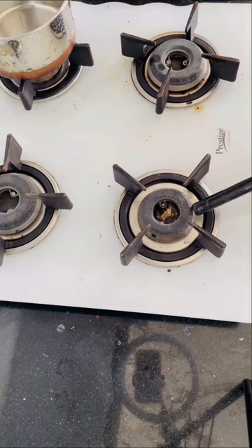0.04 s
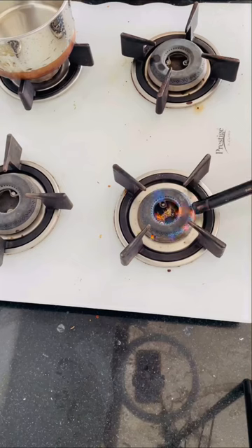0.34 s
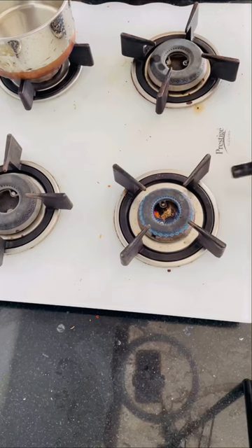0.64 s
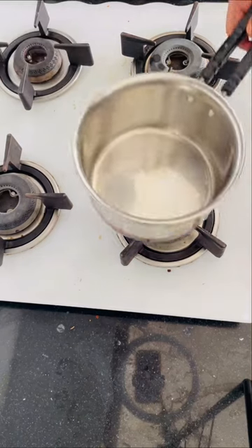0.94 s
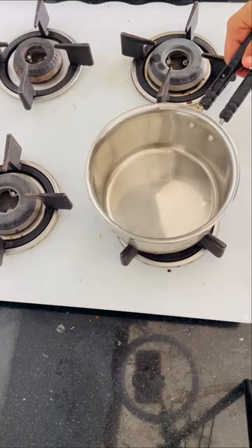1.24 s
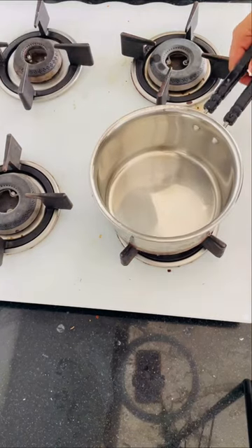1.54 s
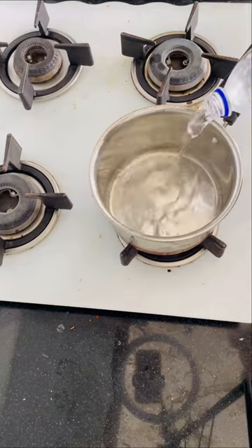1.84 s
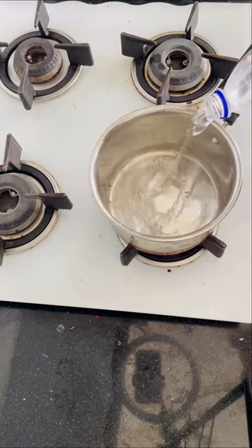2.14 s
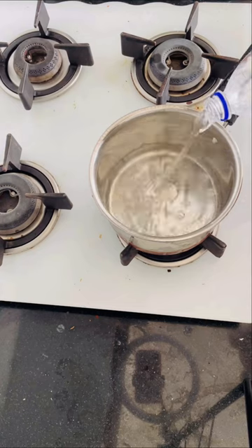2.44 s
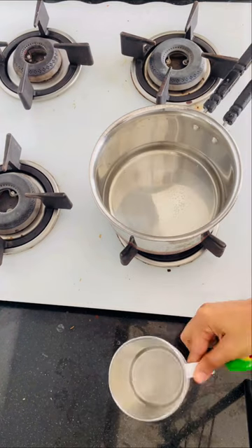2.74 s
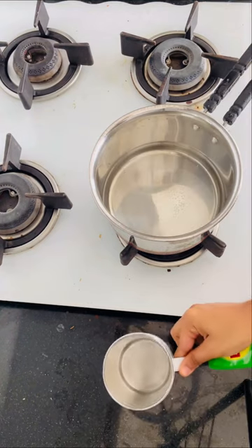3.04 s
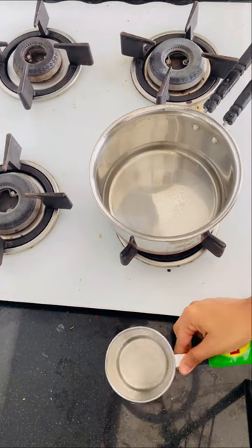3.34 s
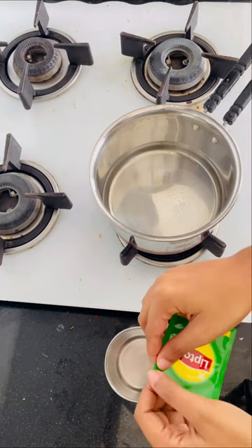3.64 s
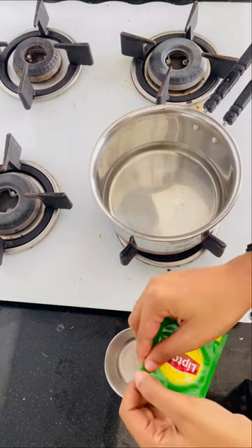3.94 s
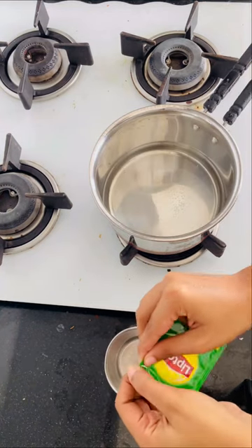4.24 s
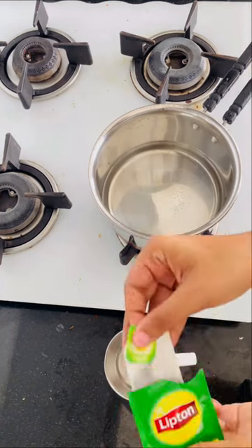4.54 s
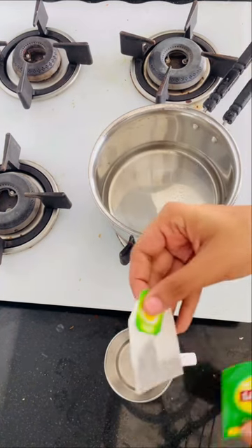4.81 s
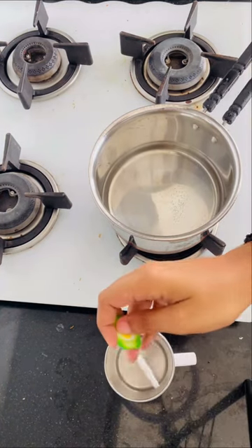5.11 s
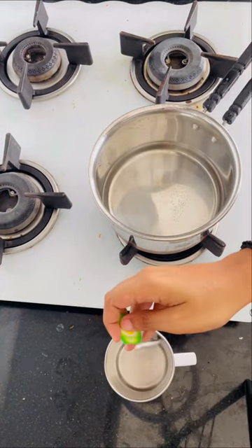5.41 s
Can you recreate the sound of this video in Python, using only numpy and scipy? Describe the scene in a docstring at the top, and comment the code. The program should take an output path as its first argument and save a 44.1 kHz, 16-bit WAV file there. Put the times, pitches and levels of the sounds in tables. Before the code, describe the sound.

A spark lighter snaps at a gas burner and the flame catches with a soft, low puff. A steel pot clangs onto the grate, rattling and ringing as it settles. Water glugs into it from a crackling plastic bottle and stops abruptly. A mug clacks onto a stone counter, then a foil tea sachet crinkles and tears open. A phone microphone hears it from above in a small, hard-walled kitchen with a faint motor hum.

```python
"""A steel pot clangs onto the grate of a gas hob, its thin wall ringing as it rocks and settles. Tea is being
made in a small hard-walled kitchen, heard from above by a phone's two microphone ports. First a spark lighter
snaps and the gas catches; after the pot lands, water glugs into it from a crackling plastic bottle, a mug is
put on the stone counter and a foil tea sachet is torn open. A motor and the mains hum in the background."""
import sys
import numpy as np
from scipy import signal
from scipy.fft import rfft, irfft, next_fast_len
from scipy.io import wavfile
from scipy.ndimage import uniform_filter1d, map_coordinates

SR = 44100
rng = np.random.default_rng(int(sys.argv[2]) if len(sys.argv) > 2 else 0)


def to_wav(sig):
    """Store sig (one row per channel, or 1-D mono) as 16-bit WAV at the path in sys.argv[1].

    Samples outside -1..1 are clipped; the rate is SR.
    """
    pcm = np.clip(np.atleast_2d(sig), -1, 1) * 32767
    pcm = np.round(pcm).astype(np.int16)
    wavfile.write(sys.argv[1], SR, pcm.T)  # frames by channels


N = 250070
TIME, RING_TIME = np.arange(N) / SR, np.arange(SR) / SR  # the whole scene; one second for a ring-out


# the pot lands and rocks on the grate: t/s, then relative level/dB of wall, base, hob, scrape
POT_HITS = [(1.2524, -24.5, -10.5, -21, -16.5), (1.2616, -24.5, -12.5, -26.5, -21.5),
            (1.279, -27.5, -30.5, -44.5, -28), (1.371, -55, -24.5, -37, -56),
            (1.4087, -31, -24.5, -25, -42), (1.4862, -41, -21, -31, -44), (1.691, -80, -37, -42.5, -70)]
# modes of the pot's wall, and of its base pressed on the grate: f/Hz, level/dB, t60/s
WALL_MODES = [(991, -17, .4), (1082, -10, 0.55), (1275, 2.5, 0.77), (1378, -12, .6), (1553, -9, 0.7),
              (1625, -9.5, 0.8), (1877, -1.5, 0.8), (1981, -14, 0.6), (2099, -9.5, 0.9), (2363, -9, 1.1),
              (2406, -10, 0.6), (2470, -5, 0.35), (2686, 4, 0.5), (2794, -10, 0.27), (3018, -17, .8),
              (3095, -13, .55), (3208, -12, 0.5), (3370, -17, .5), (3460, -17, .5), (3784, -9, 0.45),
              (3838, -13, .5), (4140, -5.5, 0.27), (4245, -11, 0.25), (4490, -13.5, .55), (4795, -18, .45),
              (4936, -18, .3), (5132, -6, 0.3), (5270, -11.5, 0.32), (5940, -18, 0.3), (8360, -22.5, 0.25),
              (9470, -13, 0.18)]
BASE_MODES = [(85.3, -15.5, 1.58), (354, -6.5, 0.36), (495, -8, 0.38), (563, 3.5, 0.13), (609, -4, 0.19),
              (699, -5, 0.22), (786, -9, .2), (870, -12, 0.13), (1428, -.5, 0.19), (1465, -5, 0.15)]
# spectra of the hob's sheet-metal top, and of the pot scraping the grate: f/Hz, level/dB
HOB_SPECTRUM = [(40, -28.5), (90, 6), (200, -3), (340, 2), (420, -2.5), (580, -6.5), (760, -1),
                (1000, -23.5), (2000, -16), (6000, -53)]
SCRAPE_SPECTRUM = [(200, -28), (700, 15.5), (1500, -12), (2800, -8.5), (5300, -11), (7000, -15.5),
                   (10500, -9), (13000, -24.5), (16000, -17)]
def pot():
    """At the hob, each contact rings the pot's thin wall, its damped base and the metal top beneath."""
    times, wall_db, base_db, hob_db, scrape_db = np.transpose(POT_HITS)
    wall = amp(-5.5) * struck(WALL_MODES, times, wall_db, drift=4, twin_db=-9, split_hz=9.92)
    grate_damping = fade(np.maximum(RING_TIME - .28, 0), t60=1.8)  # sets in once the pot sits
    out = rattle(times[0])
    upper_modes = shimmer(count=40, low_hz=2195, octaves=1.6, t60=0.41)
    base = amp(-3.5) * struck(BASE_MODES, times, base_db, drift=3.13, twin_db=-16.5, split_hz=20)
    add(out, times[0], wall * grate_damping + base)
    for s, ring_db, boom_db, grit_db in zip(times, wall_db, hob_db, scrape_db):
        add(out, s, amp(ring_db - 24) * upper_modes)
        add(out, s, amp(boom_db) * dying(HOB_SPECTRUM, t60=0.42, attack=0.00065))
        add(out, s, amp(grit_db) * dying(SCRAPE_SPECTRUM, t60=0.13, attack=0.00033))
    return in_kitchen(out, wet_db=-10, apart_db=-3.5)


def struck(modes, times, levels_db, drift, twin_db, split_hz):
    """Every contact feeds the modes; each beats against a close twin and wanders as the pot rocks."""
    t = RING_TIME
    out = np.zeros(len(t))
    for hz, db, t60 in modes:
        energy, decay = np.zeros(len(t)), fade(t, t60) ** 2
        for s, level_db in zip(times, levels_db):
            add(energy, s - times[0], amp(db + level_db + rng.standard_normal()) ** 2 * decay)
        phase = 2 * np.pi * (hz * t + rng.random())
        phase += drift * np.cumsum(rng.standard_normal(len(t))) / np.sqrt(SR)
        beat = 2 * np.pi * (split_hz * rng.uniform(.5, 2.5) * t + rng.random())
        out += np.sqrt(energy) * (np.sin(phase) + amp(twin_db) * np.sin(phase + beat))
    onset, release = 1 - np.exp(-t / 0.0008), np.minimum(10 * (1 - t), 1)
    return out * onset * release


def shimmer(count, low_hz, octaves, t60):
    """The many fine upper modes of the pot's wall ring as one."""
    place, life = rng.random((2, count))
    hz = low_hz * 2 ** (octaves * (np.arange(count) + place) / count)
    modes = np.transpose([hz, along(SCRAPE_SPECTRUM, hz), t60 * (.5 + life)])
    return ring(modes, attack=0.0011)


# steel touching iron: f/Hz, level/dB
RATTLE_SPECTRUM = [(300, -13.5), (700, 6.5), (1500, 3.5), (2300, 2.5), (3300, -1), (4300, -7.5), (5400, -5),
                   (7000, -20.5), (10000, -18), (15000, -40.5)]
def rattle(s):
    """From time s the base chatters on the grate in quick uneven contacts, until it sits."""
    impacts = grains(rate=220, spread_db=4)
    contact = dying(RATTLE_SPECTRUM, t60=.025, attack=0.00027)
    chatter = unit(signal.fftconvolve(impacts, contact)[:N])
    return amp(-33) * chatter * swell(s, rise=.003, hold=.26, t60=0.13, sag_db_per_s=45)


POUR_START_S, CUTOFF_S, GLUG_RISE_S, GLUG_T60_S = 1.865, 2.768, 0.015, 0.055
# glugs: t/s, length/s, relative level/dB of spray, churn, bubbles, f/Hz of first and last bubbles
GLUGS = [(1.869, .012, -44, -40.5, -39.5, 880, 650), (2.016, 0.022, -42.5, -46, -48, 2198, 1210),
         (2.196, 0.017, -44.5, -37.5, -34, 2920, 1880), (2.342, 0.036, -53, -42, -38, 2480, 1520),
         (2.443, 0.019, -45, -47, -42, 2460, 1800), (2.505, 0.023, -56, -44.5, -37, 2000, 1180),
         (2.663, 0.0093, -60, -39, -38.5, 1680, 990), (2.692, 0.04, -72, -57, -40, 560, 287)]
# spectra of the spray and of the water churning in the pot: f/Hz, level/dB
SPRAY_SPECTRUM = [(1000, -17), (3500, -2), (5500, 7.5), (7000, -2), (9500, 3), (11000, 0.5), (12500, -7.5),
                  (15500, -5), (17000, -30)]
CHURN_SPECTRUM = [(120, -2.5), (280, 10.5), (750, -0.5), (1100, -16), (1500, 2.5), (1900, -11), (2500, 4.5),
                  (3400, -22), (6000, -29)]
# single large air pockets plop: t/s, level/dB, f/Hz
PLOPS = [(1.881, -29, 615), (2.043, -32, 1480), (2.391, -32.5, 1440), (2.447, -28, 2370),
         (2.519, -27, 2360), (2.527, -31.5, 780), (2.53, -32, 1310), (2.672, -35, 860), (2.697, -30, 730),
         (2.708, -38, 287)]
# the bottle's wall snaps as air gulps in: t/s, level/dB, f/Hz
BOTTLE_SNAPS = [(1.954, -38.5, 6950), (1.996, -35, 5750), (2.187, -30.5, 14400), (2.204, -28.5, 6070),
                (2.343, -32, 11200), (2.361, -37, 12700), (2.424, -38.5, 6500), (2.465, -34.5, 6900),
                (2.595, -40.5, 8750), (2.670, -37.5, 10700), (2.75, -41, 6070)]
def water():
    """The stream sprays and churns in the pot, trapping air and ringing steel; the bottle crackles."""
    spray, churn = flow(stream_spray_db=-54.5, stream_churn_db=-51.5)
    droplets = coloured(grains(rate=4800, spread_db=3), SPRAY_SPECTRUM)
    out = amp(0.5) * spray * patchy(droplets, depth_db=7)
    out += amp(-14) * spray * froth(low_hz=3800, octaves=1.7, cycles=70, count=450)
    slosh = coloured(grains(rate=4500, spread_db=0), CHURN_SPECTRUM)
    out += amp(-4.5) * churn * patchy(slosh, depth_db=2.5)
    out += amp(-8.5) * churn * froth(low_hz=531, octaves=2.6, cycles=76, count=260)
    steel = ring(WALL_MODES, attack=.001) * fade(RING_TIME, t60=0.17)  # water damps the wall
    patter = spray * grains(rate=SR, spread_db=4.5)
    out += amp(-13) * signal.fftconvolve(patter, steel / np.linalg.norm(steel))[:N]
    for s, length, _, _, bubbles_db, first_hz, last_hz in GLUGS:
        add(out, s, amp(bubbles_db) * plunge(length, first_hz, last_hz, count=22, scatter_octaves=0.505))
    for s, db, hz in PLOPS:
        add(out, s, amp(db) * bubble(hz, cycles=38.6, rise=0.075))
    for s, db, hz in BOTTLE_SNAPS:
        add(out, s, amp(db) * snap(hz, t60=0.058, focus_db=16.5))
    # the water's sound, echo included, is cut off abruptly
    cutoff = fade(np.maximum(TIME - CUTOFF_S, 0), t60=0.074)
    return in_kitchen(out, wet_db=-7.5, apart_db=-4.5) * cutoff


def flow(stream_spray_db, stream_churn_db):
    """Strength of spray and churn: an even stream, with a surge as each slug of water lands."""
    stream = swell(POUR_START_S, GLUG_RISE_S, CUTOFF_S - POUR_START_S, GLUG_T60_S)
    spray, churn = amp(stream_spray_db) * stream, amp(stream_churn_db) * stream
    for s, length, spray_db, churn_db, *_ in GLUGS:
        surge = swell(s, GLUG_RISE_S, length, GLUG_T60_S)
        spray = np.hypot(spray, amp(spray_db) * surge)
        churn = np.hypot(churn, amp(churn_db) * surge)
    return spray, churn


def plunge(length, first_hz, last_hz, count, scatter_octaves):
    """A slug of water drives air under: small bubbles ring first, larger, lower ones as it sinks."""
    out = np.zeros(SR // 3)
    depths = (np.arange(count) + rng.random(count)) / count
    for depth, detune in zip(depths, rng.standard_normal(count)):
        hz = first_hz * (last_hz / first_hz) ** depth * 2 ** (scatter_octaves * detune)
        add(out, GLUG_RISE_S / 2 + depth * length, bubble(hz, cycles=20, rise=0.061))
    return out


def froth(low_hz, octaves, cycles, count):
    """A swarm of small bubbles through the pour, at rms 1 while it lasts."""
    out = np.zeros(N)
    length = CUTOFF_S - POUR_START_S
    for when, faintness, pitch in rng.random((count, 3)):
        hz = low_hz * 2 ** (octaves * pitch)
        add(out, POUR_START_S + when * length, amp(-20 * faintness) * bubble(hz, cycles, rise=0.032))
    return unit(out) * np.sqrt(length / (N / SR))


def bubble(hz, cycles, rise):
    """An air pocket rings and climbs in pitch as it nears the surface."""
    life = cycles / hz
    t = RING_TIME[:int(life * SR) + 1]
    pitch = hz * (1 + rise * t / life)
    return np.sin(2 * np.pi * np.cumsum(pitch) / SR) * fade(t, life) * (1 - np.exp(-t * hz))


# clicks at the burner: t/s, relative level/dB of the click, level/dB of the hob's thump
LIGHTER_CLICKS = [(0.241, -21.5, -23.5), (0.4198, -50, -55), (.513, -50, -50)]
# light knocks of the lighter against the burner: t/s, level/dB, f/Hz, level/dB of the hob's thump
LIGHTER_TAPS = [(.3305, -34, 750, -34), (.7152, -35.5, 3300, -66), (.718, -30.5, 950, -58)]
# spectra of a click and of a knock: f/Hz, level/dB
SPARK_SPECTRUM = [(100, -24), (500, -9), (900, -6), (1400, -12), (1900, -1.5), (3200, -0.5), (4800, -3),
                  (6200, 5.5), (7500, -2), (8800, -2.5), (11500, -10), (15300, -6), (17000, -24.5)]
TAP_SPECTRUM = [(200, -5), (500, -6), (850, 0.5), (1400, -5.5), (2500, -2), (4200, -9), (7000, -31),
                (10000, -20), (15000, -47)]
# modes of the lighter's barrel: f/Hz, level/dB, t60/s
BARREL_MODES = [(871, 2, 0.05), (1800, 2, 0.018), (2750, 3, .015), (5900, 7, .012)]
def lighter():
    """At the burner a trigger squeaks; the spring hammer snaps, rings the barrel and jolts the hob."""
    out = np.zeros(N)
    squeak = dying(SPARK_SPECTRUM, t60=.04, attack=0.00144, focus=(4300, .2, 20))
    add(out, .236, amp(-33) * squeak)  # just before the hammer trips
    for s, db, _ in LIGHTER_CLICKS:
        add(out, s, amp(db + 10) * dying(SPARK_SPECTRUM, t60=0.03, attack=0.00034))
        add(out, s, amp(db - 5) * ring(BARREL_MODES, attack=0.0018))
    for s, db, hz, _ in LIGHTER_TAPS:
        add(out, s, amp(db) * dying(TAP_SPECTRUM, t60=0.029, attack=0.0004, focus=(hz, .8, 14)))
    for s, *_, thump_db in LIGHTER_CLICKS + LIGHTER_TAPS:
        add(out, s, amp(thump_db) * dying(HOB_SPECTRUM, t60=0.14, attack=0.0056))
    return in_kitchen(out, wet_db=-3.5, apart_db=-7.5)


# the mug meets the counter: t/s, then relative level/dB of ring, clack, thud
MUG_HITS = [(3.0042, -26.5, -25.5, -29), (3.091, -31.5, -34, -33), (3.124, -39, -49, -38.5),
            (3.312, -49.5, -68.5, -40.5)]
# modes of the mug and of the slab under it: f/Hz, level/dB, t60/s
MUG_MODES = [(242, -9, 0.23), (298, -14.5, 0.3), (386, -17, .17), (505, -12.5, 0.22), (787, 4, 0.051),
             (967.5, -9.5, 0.26), (1690, -8, 0.052), (2810, -19, 0.055), (3464, -14, 0.066)]
COUNTER_MODES = [(152.4, 4, 0.087)]
# the mug's clack on stone: f/Hz, level/dB
CLACK_SPECTRUM = [(100, -7), (400, 6), (800, 6.5), (1200, -8.5), (1700, 4), (2300, -7.5), (3500, -10.5),
                  (5000, -20.5), (8000, -31.5), (15000, -54)]
def mug():
    """On the counter, the mug lands on one edge and settles; the stone answers with a dull thud."""
    out = np.zeros(N)
    for s, ring_db, clack_db, thud_db in MUG_HITS:
        add(out, s, amp(ring_db) * ring(MUG_MODES, attack=0.0038))
        add(out, s, amp(clack_db + 0.5) * dying(CLACK_SPECTRUM, t60=0.044, attack=0.00034))
        add(out, s, amp(thud_db + 13) * ring(COUNTER_MODES, attack=0.023))
    return in_kitchen(out, wet_db=-6)


# the sachet is torn, the bag slides out, the wrapper is pulled away: t/s, length/s, level/dB
SACHET_PULLS = [(4.109, 0.01, -49), (4.49, 0.11, -45), (4.833, 0.1, -45)]
# creases snap: t/s, level/dB and f/Hz of the crack, level/dB and f/Hz of the panel's pop
CREASE_SNAPS = [(4.0874, -29, 8000, -34, 600), (4.1162, -34.5, 6300, -49, 900),
                (4.138, -40, 2830, -40, 800), (4.362, -37, 6460, -50, 1200),
                (4.599, -30.5, 7360, -39, 1210), (4.6485, -22.5, 6000, -48, 1500),
                (4.8501, -22.5, 7050, -30.5, 1500), (4.9395, -34.5, 2550, -47, 1200),
                (5.2408, -36, 5800, -65, 1200)]
# spectra of a thin sheet crackling and of its panel popping: f/Hz, level/dB
CRACKLE_SPECTRUM = [(150, 1.5), (600, -4.5), (1800, 4), (3500, 3), (5500, 6), (7000, -0.5), (9300, 5.5),
                    (11000, 1), (14000, -5), (15700, 2), (17000, -12)]
POP_SPECTRUM = [(200, -19.5), (500, -1.5), (750, -2), (1200, -3.5), (1800, -5.5), (3000, -6), (8000, -19)]
def sachet():
    """Creases snap and pop the foil panel over the fine crackle of tearing and sliding."""
    pull = sum(amp(db) * swell(s, rise=0.012, hold=length, t60=0.12, sag_db_per_s=42)
               for s, length, db in SACHET_PULLS)
    out = pull * coloured(grains(rate=3600, spread_db=1.5), CRACKLE_SPECTRUM)
    for s, db, hz, pop_db, pop_hz in CREASE_SNAPS:
        add(out, s, amp(db) * snap(hz, t60=0.024, focus_db=11))
        add(out, s, amp(pop_db) * dying(POP_SPECTRUM, t60=0.031, attack=0.00085, focus=(pop_hz, .8, 9)))
    return in_kitchen(out, wet_db=-9)


def snap(hz, t60, focus_db):
    """A thin plastic sheet buckles: a crack that is strongest around the pitch of the panel."""
    return dying(CRACKLE_SPECTRUM, t60, attack=.0001, focus=(hz, .33, focus_db))


# the flame's low flutter: f/Hz, level/dB
FLAME_SPECTRUM = [(25, -28), (50, -5), (90, 21.5), (130, -15), (250, 1), (1000, -71), (4000, -70)]
def flame():
    """At the burner, the gas catches in one soft puff."""
    puff = swell(s=0.71, rise=0.048, hold=0, t60=0.65)
    return amp(-37) * puff * coloured(rng.standard_normal(N), FLAME_SPECTRUM)


# the hum's tones, from a motor and the mains, and the spectrum of the room tone: f/Hz, relative level/dB
HUM_TONES = [(86, -53.5), (100, -52), (300.5, -63.5), (403, -76.5), (590, -76.5)]
ROOM_SPECTRUM = [(22, -55), (32, -19.5), (45, 5), (75, 4), (95, 6), (125, -3.5), (200, -9), (250, -13),
                 (600, -14), (1000, -22.5), (3000, -28.5), (6500, -34), (8200, -53), (11000, -38.5),
                 (14000, -49.5), (15500, -46.5)]
# slow rise and fall of both: t/s, level/dB
BACKGROUND_LEVEL = [(0, 3), (2.4, 2), (2.9, 0), (4.2, -0.5), (4.8, 2.5), (5.67, 3.5)]
def background():
    """Behind everything a hum of motor and mains wavers over the room tone, whose lows reach both ports alike."""
    hum = np.zeros(N)
    for hz, db in HUM_TONES:
        peak = np.sqrt(2) * amp(db + 2.7 * wobble(rate=2.8))
        hum += peak * np.sin(2 * np.pi * hz * TIME + .5 * wobble(rate=3.7))
    common, apart = coloured(rng.standard_normal((2, N)), ROOM_SPECTRUM)
    apart = filtered(apart, lambda hz: amp(-3.5) * above(hz, corner_hz=450))
    room_tone = amp(-50) * np.array([common + apart, common - apart])
    level_db = np.interp(TIME, *np.transpose(BACKGROUND_LEVEL))
    return amp(level_db) * (hum + room_tone)


# reverberation between the kitchen's hard walls: f/Hz, t60/s
KITCHEN_DECAY = [(100, 0.56), (500, 0.48), (2000, 0.47), (6000, 0.36), (15000, 0.27)]
def in_kitchen(x, wet_db, apart_db=-7):
    """Direct sound plus the walls' answer, which two ports close together hear alike in the bass."""
    hz, t, noise = signal.stft(rng.standard_normal((2, SR * 3 // 4)), SR, nperseg=256)
    decay = fade(t, along(KITCHEN_DECAY, hz)[:, None])
    common, apart = signal.istft(noise * decay, SR, nperseg=256)[1]
    apart = filtered(apart, lambda f: amp(apart_db) * above(f, corner_hz=230))
    onset = 1 - np.exp(-np.arange(len(common)) / SR / 0.00069)
    tails = np.array([common + apart, common - apart]) * onset
    reverb = signal.fftconvolve(x[None], tails / np.linalg.norm(tails[0]), axes=1)[:, :N]
    return x + amp(wet_db) * reverb


def ring(modes, attack):
    """Separate modes, struck at slightly new strengths each time."""
    hz, db, t60 = np.transpose(modes)[..., None]
    size = amp(db + rng.standard_normal(hz.shape))
    waves = np.sin(2 * np.pi * (hz * RING_TIME + rng.random(hz.shape))) * fade(RING_TIME, t60)
    return (size * waves).sum(0) * (1 - np.exp(-RING_TIME / attack))


def dying(spectrum, t60, attack, focus=(1, 1, 0)):
    """A dying noise burst with a smooth spectrum, lifted at a focus (f/Hz, width/octaves, lift/dB)."""
    t = RING_TIME[:next_fast_len(int(2 * t60 * SR) + 512, real=True)]
    hz = np.fft.rfftfreq(len(t), 1 / SR)
    centre, width, lift = focus
    bump_db = lift * np.exp(-(np.log2((hz + 1) / centre) / width) ** 2)
    gain = amp(along(spectrum, hz) + bump_db)
    onset = 1 - np.exp(-t / attack)
    shape = onset * fade(t, t60)
    x = rng.standard_normal(len(t)) * shape
    for _ in range(2):  # impose the spectrum, then confine the burst in time again
        phases = np.exp(1j * np.angle(rfft(x)))
        x = irfft(gain * phases, len(t)) * onset * np.exp(-(t / t60) ** 2)
    return x * np.linalg.norm(shape) / np.linalg.norm(x)


def grains(rate, spread_db):
    """Random tiny impacts of uneven size, rate a second."""
    hits = rng.random(N) < rate / SR
    return hits * rng.standard_normal(N) * amp(spread_db * rng.standard_normal(N))


def patchy(x, depth_db):
    """x with random swells a few hundred Hz wide and some 30 ms long, at rms 1."""
    spectra = signal.stft(x, nperseg=512)[2]
    field = uniform_filter1d(rng.standard_normal(spectra.shape), size=5, axis=0)
    field = unit(uniform_filter1d(field, size=6, axis=1))
    return unit(signal.istft(spectra * amp(depth_db * field), nperseg=512)[1][:N])


def swell(s, rise, hold, t60, sag_db_per_s=0):
    """A gain per sample: rises from time s, holds while it sags, then dies away."""
    t = np.maximum(TIME - s, 0)
    return np.minimum(t / rise, 1) * amp(-sag_db_per_s * t) * fade(np.maximum(t - rise - hold, 0), t60)


def fade(t, t60):
    """Free decay, 60 dB in t60."""
    return np.exp(-np.log(1000) * t / t60)


def wobble(rate):
    """A smooth random curve with rate knots a second."""
    return map_coordinates(rng.standard_normal(int(N * rate / SR) + 4), [TIME * rate])


def coloured(x, spectrum):
    """x shaped by the given spectrum, at rms 1."""
    return unit(filtered(x, lambda hz: amp(along(spectrum, hz))))


def filtered(x, response):
    """x through a frequency response."""
    n = x.shape[-1]
    padded = next_fast_len(n + 8192)
    return irfft(rfft(x, padded) * response(np.fft.rfftfreq(padded, 1 / SR)), padded)[..., :n]


def above(hz, corner_hz):
    """Gain of a second-order high-pass."""
    return hz ** 2 / (hz ** 2 + corner_hz ** 2)


def along(points, hz):
    """(f/Hz, value) points read on a log axis."""
    freqs, values = np.transpose(points)
    return np.interp(np.log(hz + 1), np.log(freqs + 1), values)


def amp(db):
    """Decibels to gain."""
    return 10 ** (np.asarray(db) / 20)


def unit(x):
    """Scale to rms 1."""
    return x / np.sqrt(np.mean(x ** 2) + 1e-20)


def add(track, s, sound):
    """Mix a sound in at time s."""
    span = track[round(s * SR):][:len(sound)]
    span += sound[:len(span)]


# phase by which the left microphone port leads the right: f/Hz, lead/rad
PORT_LEAD = [(100, 0), (1600, 0), (2760, .4), (3300, 1.7), (3790, .3), (4310, 1), (5000, -.1), (6000, 1.3),
             (7060, 2.9), (8800, 3.7), (10100, 5.9), (12100, 6.7), (13200, 9), (15600, 10)]
def scene():
    """The kitchen from above; the phone's body shifts phase between ports and tips the mids right."""
    mix = lighter() + flame() + pot() + water() + mug() + sachet() + background()
    balance = [(120, 0), (300, -.6), (1200, -.9), (2500, 0)]  # left over right: f/Hz, level/dB
    side = np.array([[.5], [-.5]])
    return filtered(mix, lambda hz: np.exp(1j * side * along(PORT_LEAD, hz))
                    * amp(side * along(balance, hz)))


# brief dips in level: t/s
DIP_TIMES = [.847, 1.855, 2.776, 3.634, 4.984]
def record(dry):
    """The level dips briefly a few times; the phone rounds off high peaks and cuts the top treble."""
    ceiling, top_hz = .9, 16100
    dips = 1 - sum(.9 * np.exp(-((TIME - s) / .006) ** 2) for s in DIP_TIMES)
    limited = dry / (1 + np.abs(dry / ceiling) ** 6) ** (1 / 6)
    return filtered(dips * limited, lambda hz: 1 / (1 + (hz / top_hz) ** 80))


dry = scene()
out = record(dry)
to_wav(out)
```